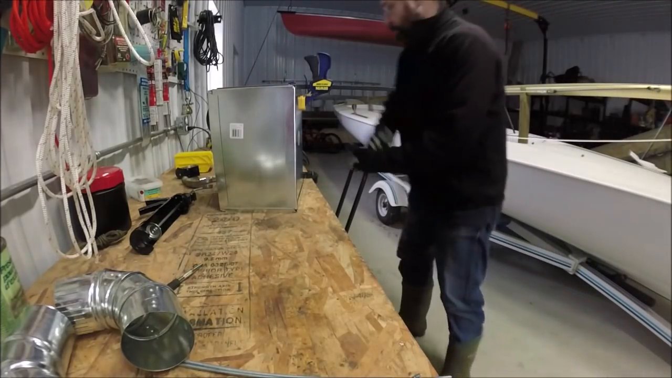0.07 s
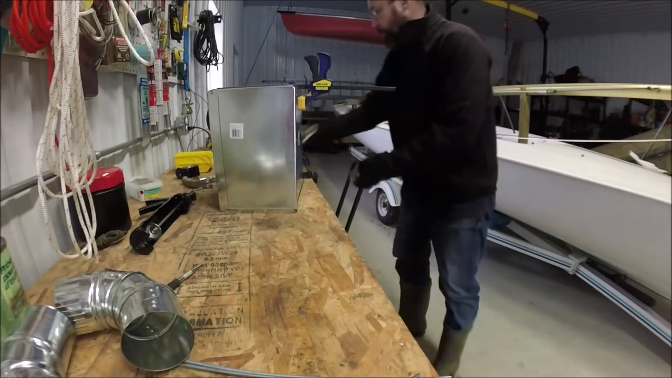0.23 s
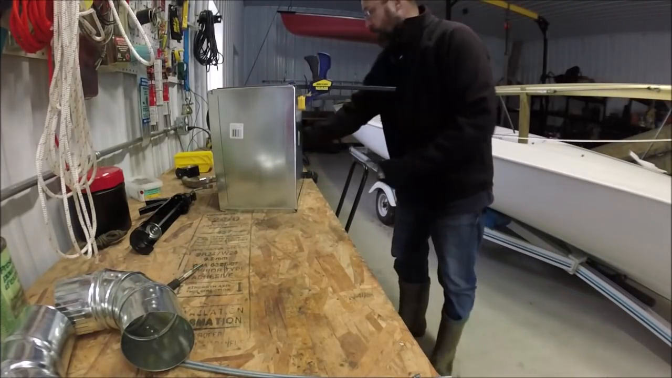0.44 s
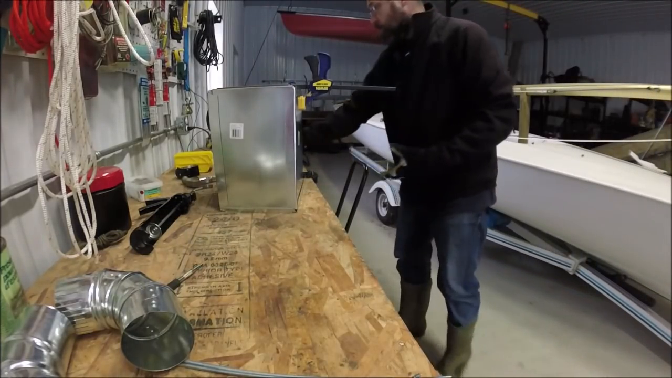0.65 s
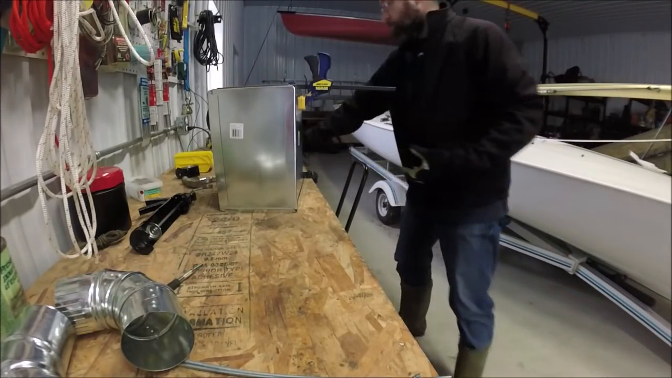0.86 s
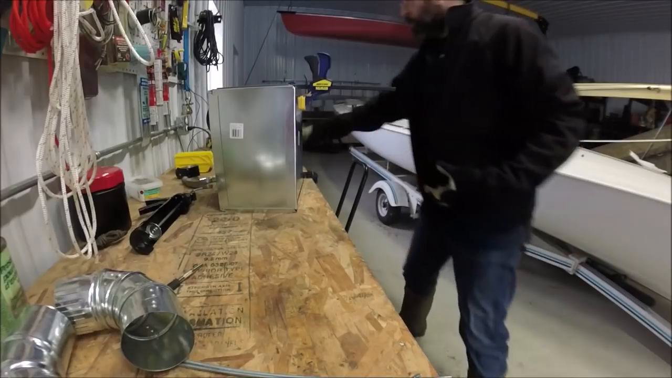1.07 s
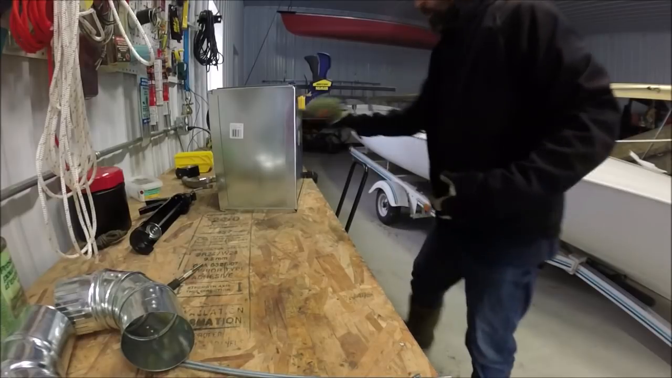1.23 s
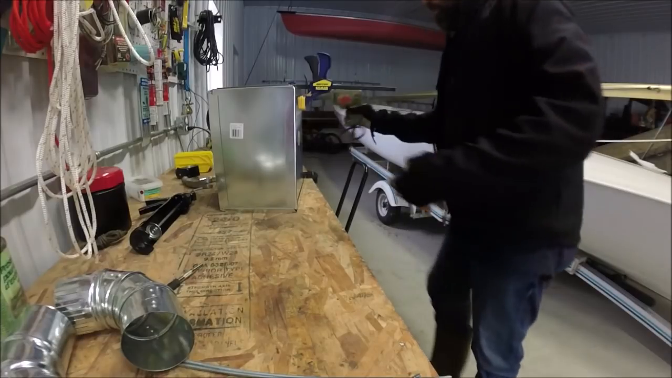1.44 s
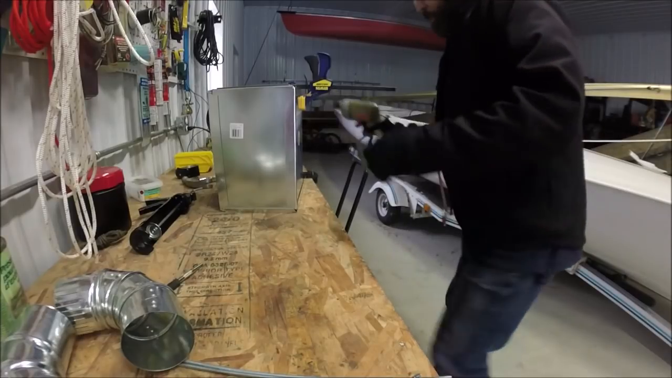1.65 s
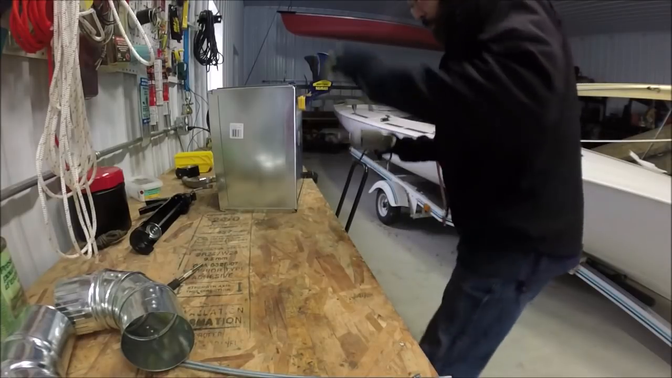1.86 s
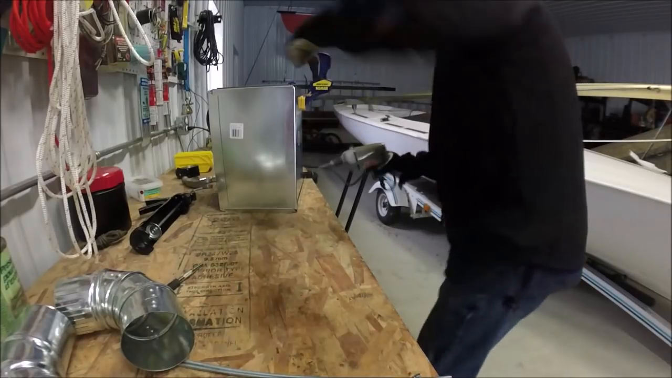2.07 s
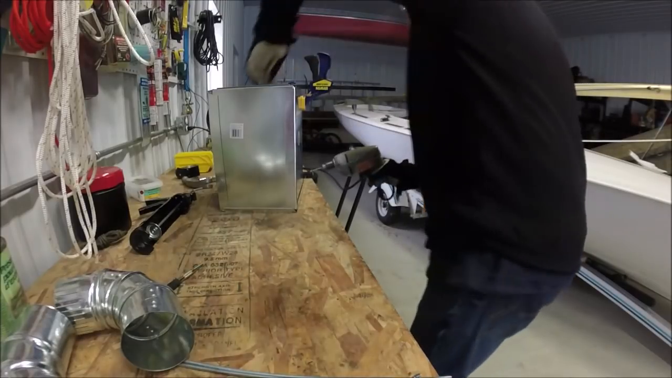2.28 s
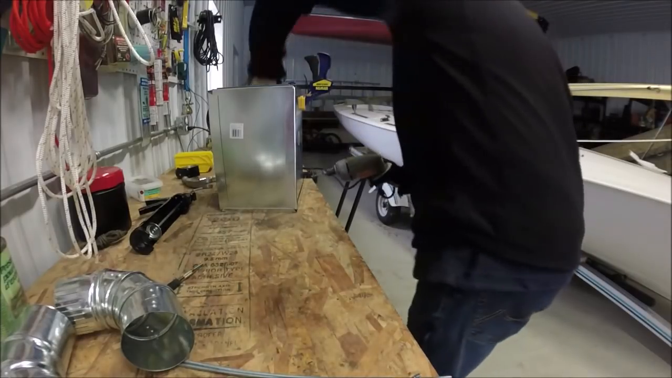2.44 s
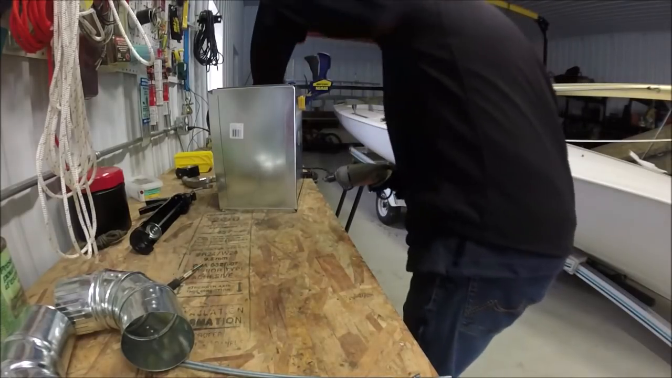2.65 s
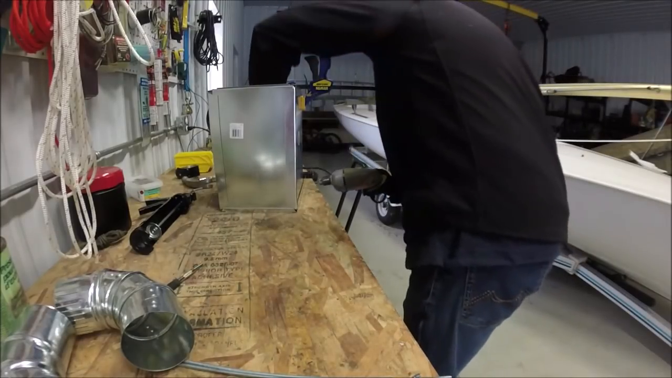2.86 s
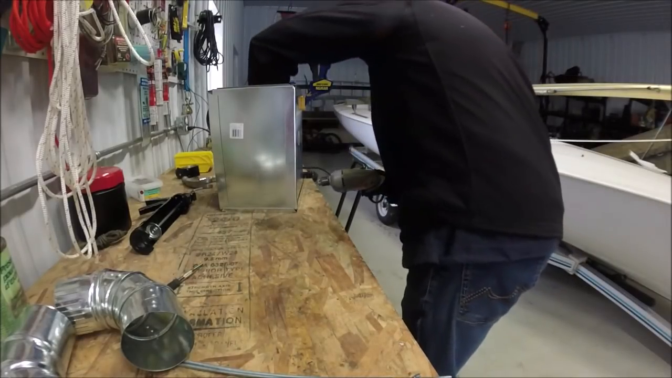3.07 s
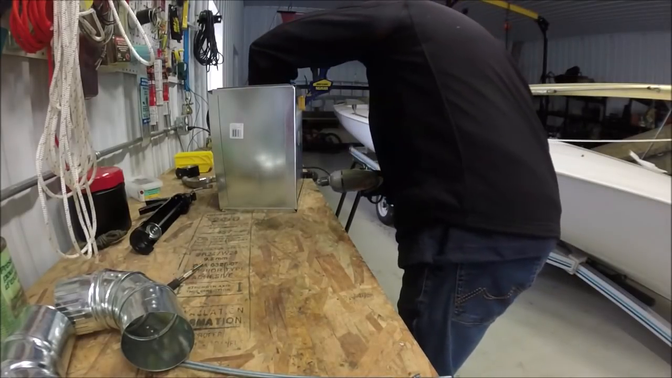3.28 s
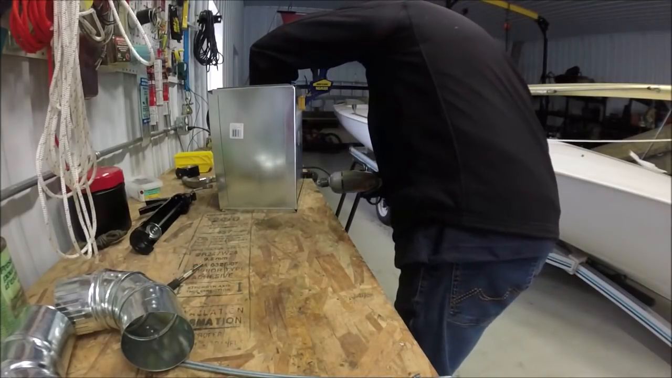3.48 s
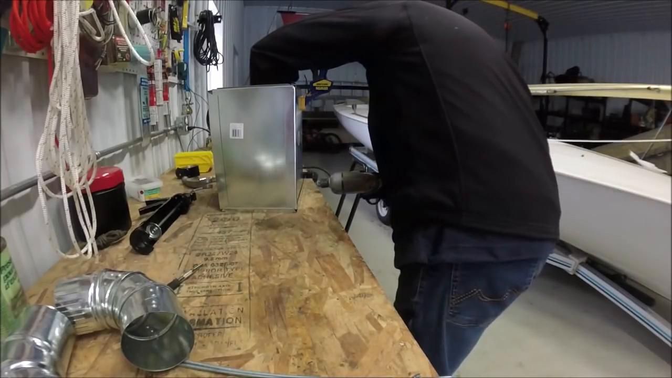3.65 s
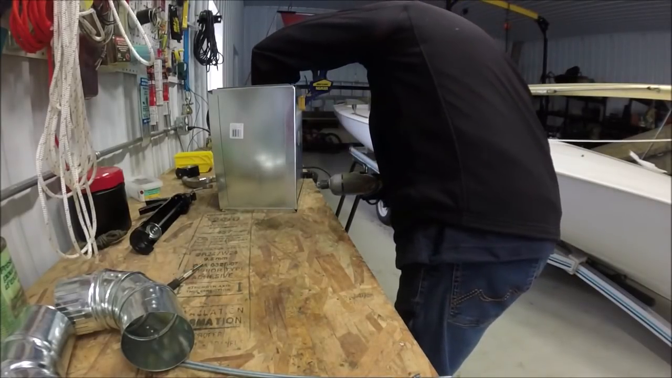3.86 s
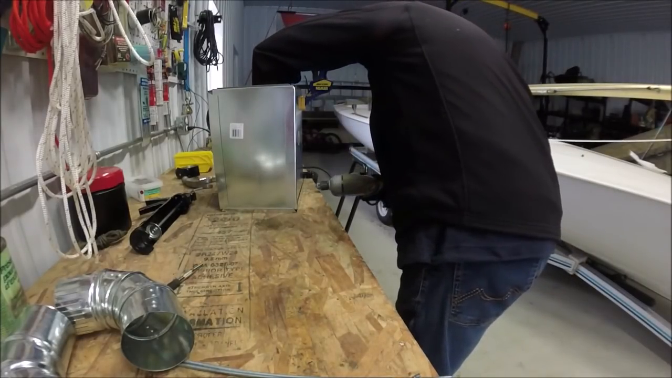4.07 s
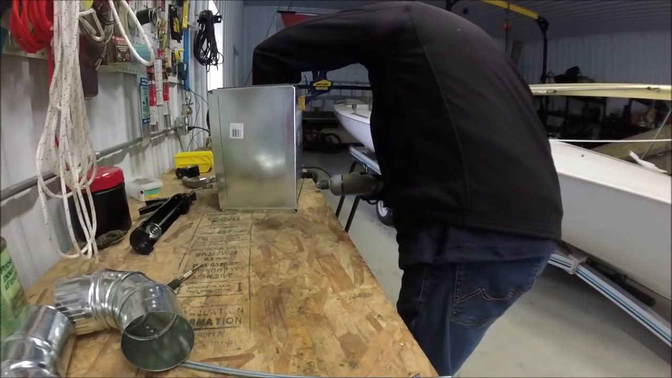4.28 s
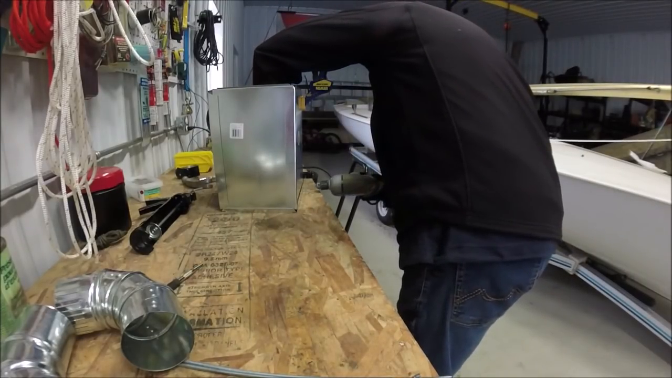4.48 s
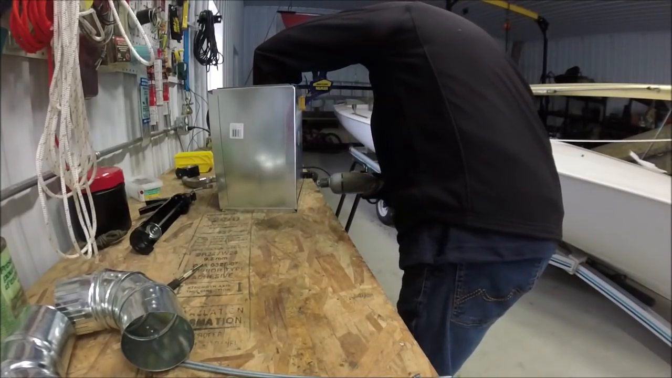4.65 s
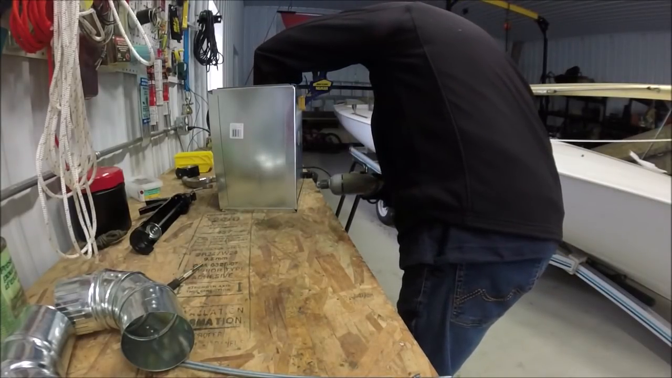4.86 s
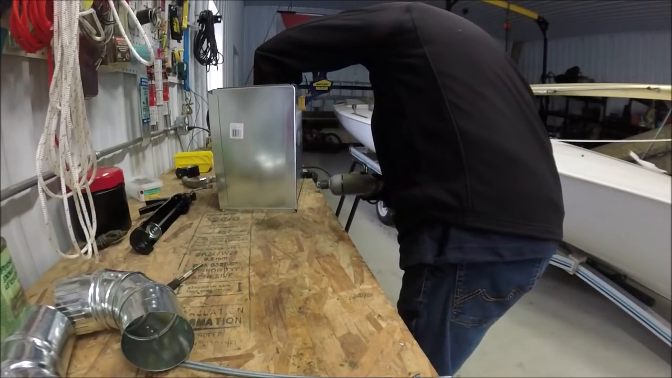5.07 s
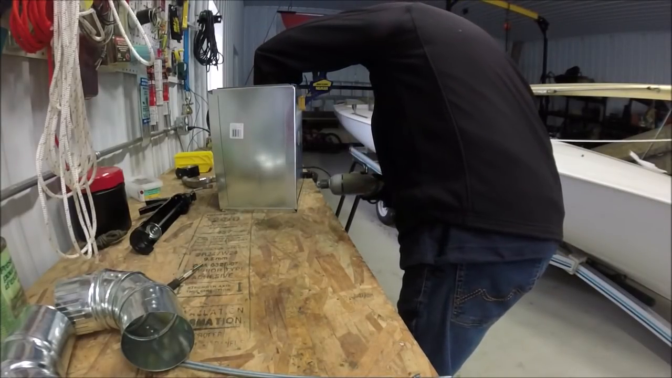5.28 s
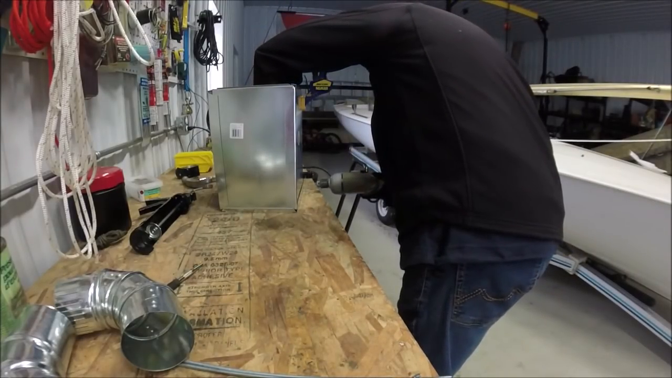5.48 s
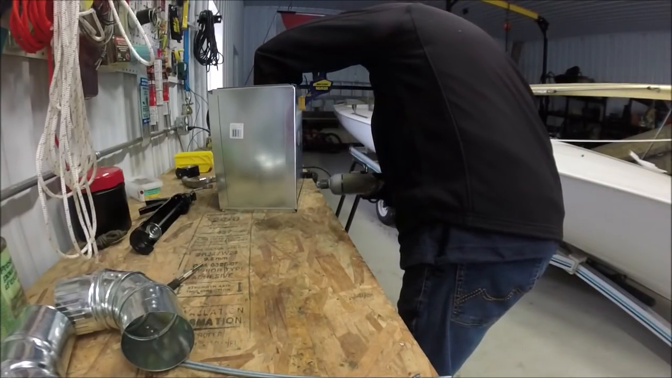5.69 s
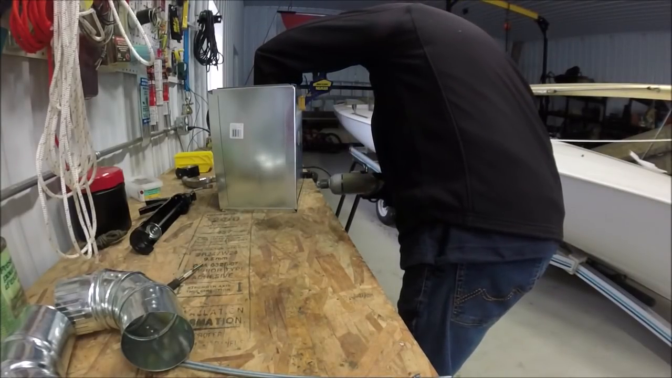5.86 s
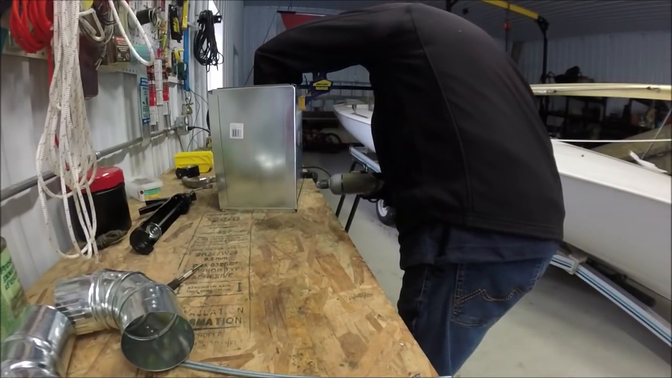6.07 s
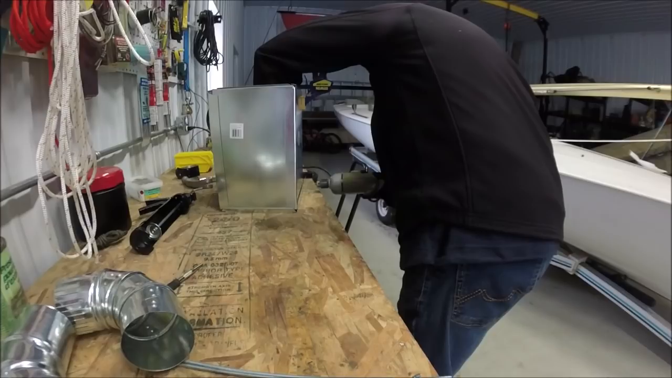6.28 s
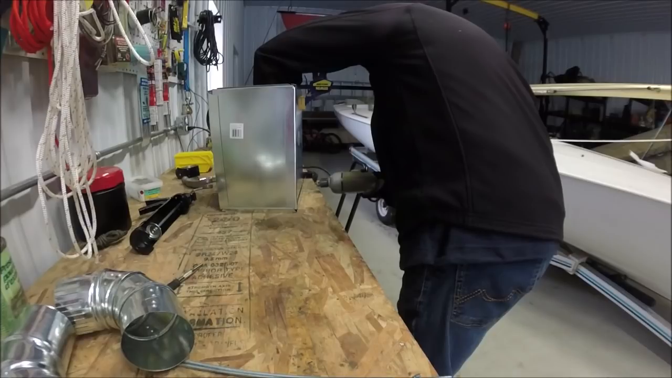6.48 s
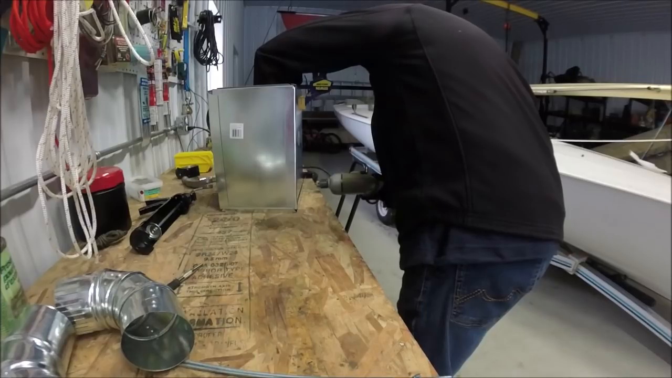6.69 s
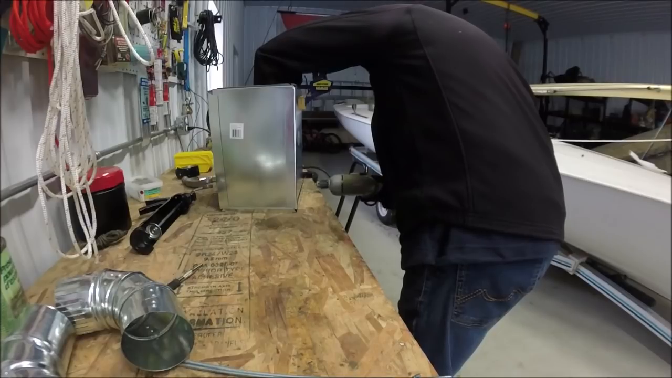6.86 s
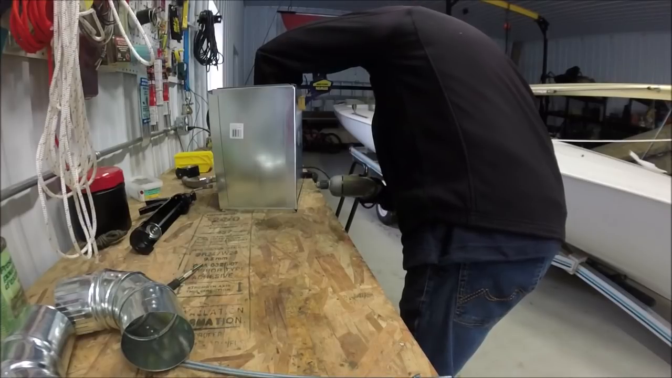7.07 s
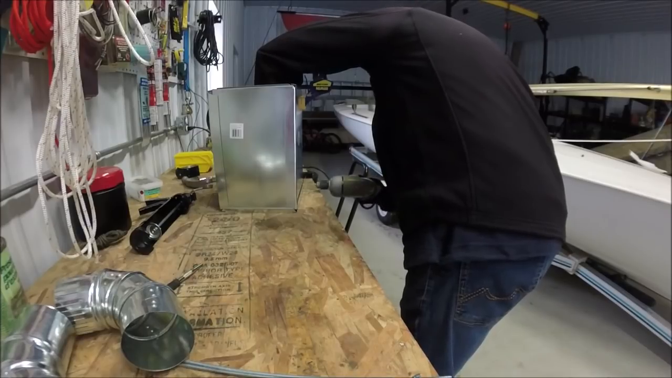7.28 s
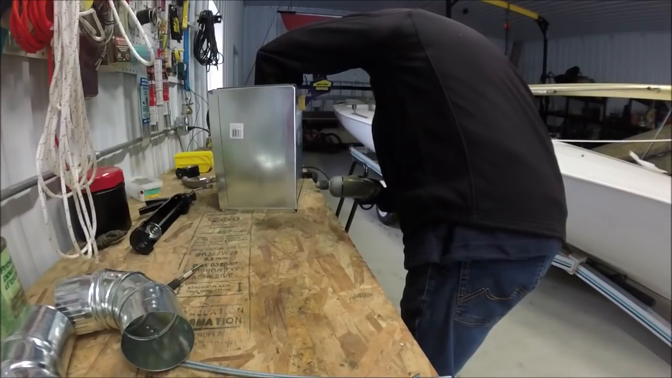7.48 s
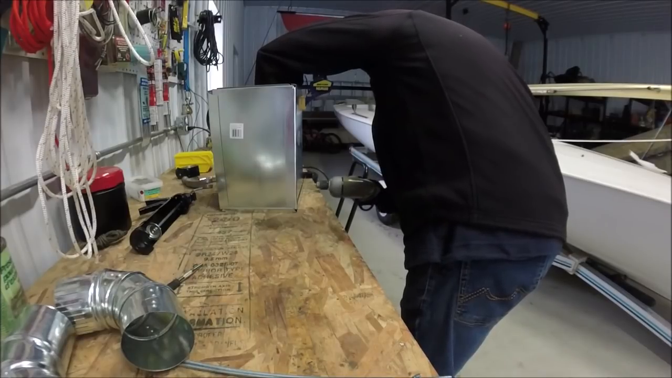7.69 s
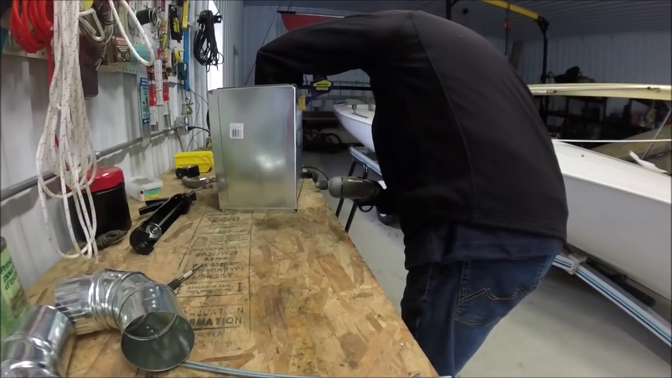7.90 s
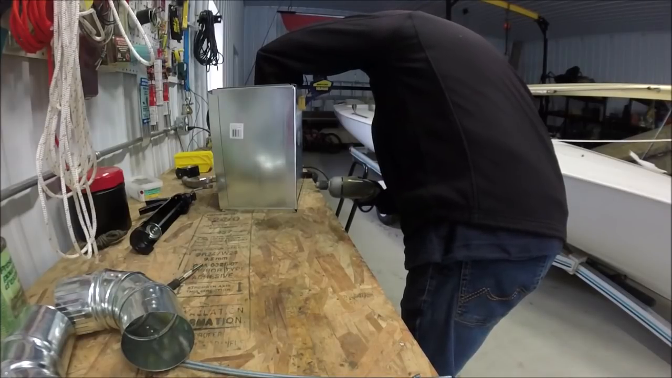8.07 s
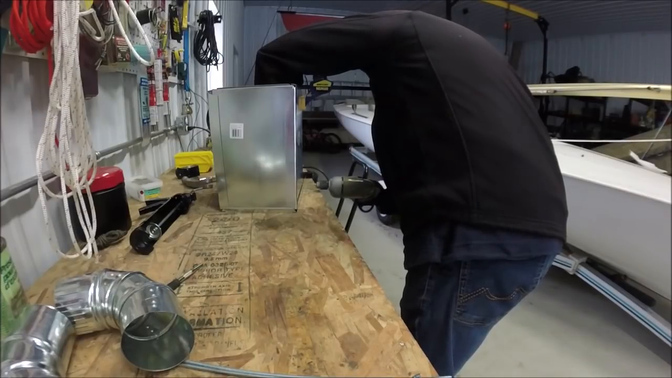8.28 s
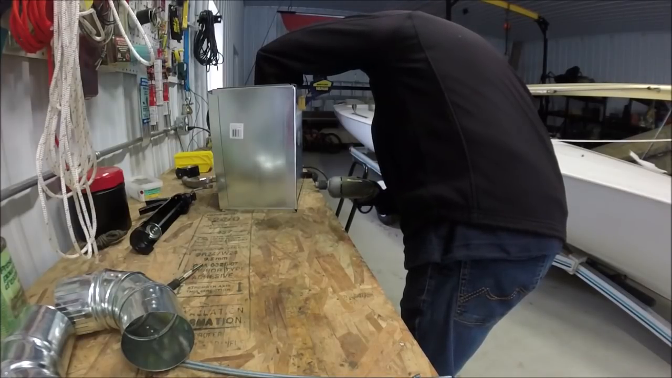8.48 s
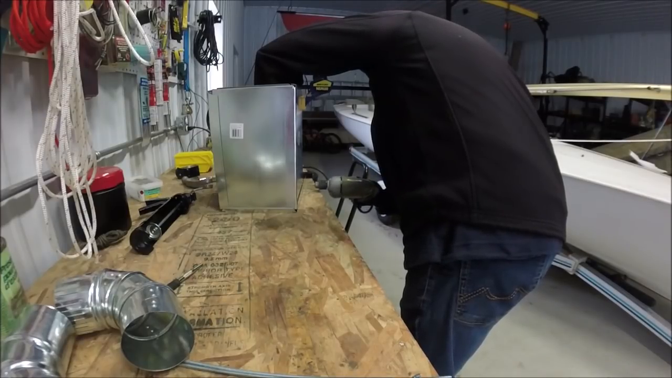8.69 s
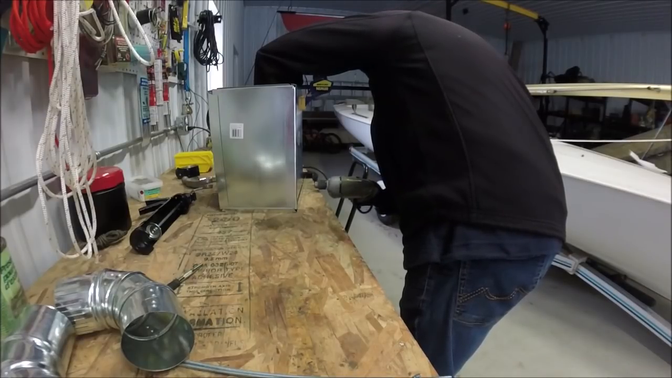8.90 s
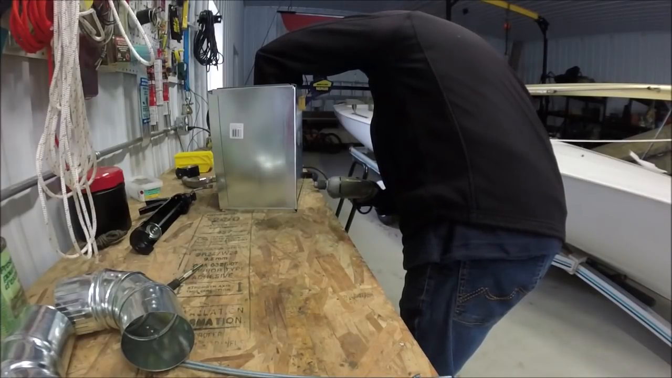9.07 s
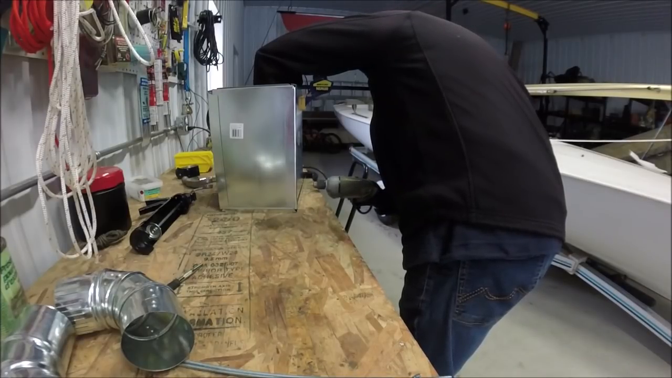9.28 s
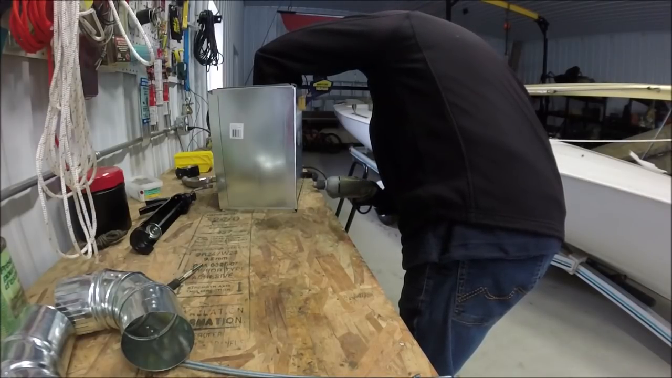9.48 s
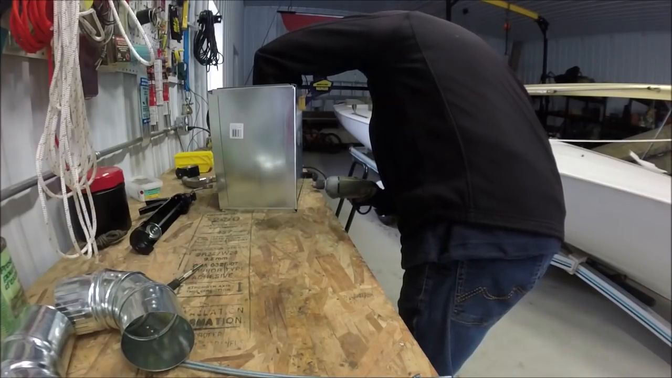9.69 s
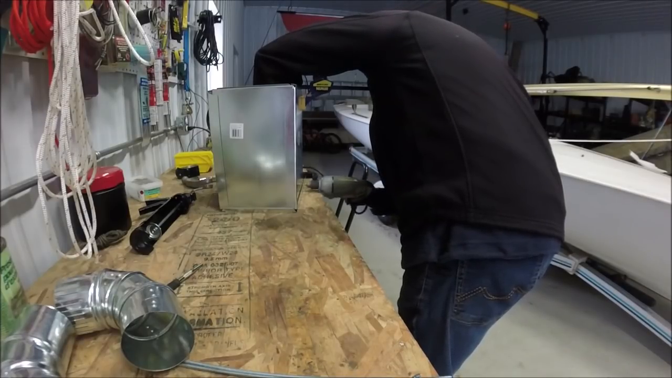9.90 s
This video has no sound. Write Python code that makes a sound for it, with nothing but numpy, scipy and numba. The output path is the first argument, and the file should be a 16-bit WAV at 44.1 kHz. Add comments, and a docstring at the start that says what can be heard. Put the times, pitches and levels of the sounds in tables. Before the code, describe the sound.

Sheet metal is knocked and set down with a clank, a bit squeaks against the wall, then a drill whirs and chatters loudly.

```python
"""A workshop with a sheet-metal box on a wooden bench. A tool is dragged off the bench, then the box is bumped
and scuffed while a screw bit is set on it; the drill starts, eases, and runs hard while its bit chatters.
Knocks, rubbing, skids and the drill push on damped modes of the box walls; singing, squeals and gear whine
are wavering tones. Boots and a tool set down ring modes of their own. A quiet hush and room echo surround it."""
import sys
import numpy as np
from scipy import signal
from scipy.fft import rfft, irfft, next_fast_len
from scipy.io import wavfile
from scipy.ndimage import uniform_filter1d
from numba import njit

SR = 44100
rng = np.random.default_rng(int(sys.argv[2]) if len(sys.argv) > 2 else 0)


def inscribe(sig):
    """Save sig as 16-bit PCM at rate SR to the path in sys.argv[1].

    A 1-D sig is mono; a 2-D sig holds one channel per row.
    Samples are clipped to [-1, 1] before scaling.
    """
    pcm = np.round(np.clip(np.atleast_2d(sig).T, -1, 1) * 32767)
    wavfile.write(sys.argv[1], SR, pcm.astype(np.int16))


N = 438354  # length in samples


def undb(db):
    """Turns decibels into an amplitude factor."""
    return 10 ** (np.asarray(db) / 20)


def unit(x):
    """Scales a signal to rms 1."""
    return x / np.sqrt(np.mean(x ** 2))


def curves(table, outside):
    """Table columns as signals, with a set level outside; a table that ends after 9.5 s holds its last value."""
    time, *columns = np.transpose(table)
    t = np.arange(N) / SR
    return [np.interp(t, time, c, outside, c[-1] if time[-1] > 9.5 else outside) for c in columns]


RING_LAG = SR // 300  # samples by which a family of modes builds up after its force


def ring(force, modes, band_hz):
    """Damped modes heard in one band, moved earlier by their build-up; white noise of rms 1 gives rms 1."""
    t = np.arange(SR // 2) / SR
    h = np.zeros(len(t))
    for hz, db, t60 in modes:
        h += undb(db) * np.sin(2 * np.pi * hz * t) * 1000 ** (-t / max(t60, .01))
    h = signal.sosfilt(signal.butter(4, band_hz, "band", fs=SR, output="sos"), h)
    h /= np.sqrt(np.sum(h ** 2))
    return signal.fftconvolve(force, h)[RING_LAG:RING_LAG + N]


def colour(x, points):
    """Shapes the spectrum of a signal by points of frequency and level."""
    size = next_fast_len(N)
    hz, db = np.transpose(points)
    bin_hz = np.arange(size // 2 + 1) * SR / size
    gain = undb(np.interp(np.log(bin_hz + 1), np.log(hz), db))
    return irfft(rfft(x, size) * gain, size)[:N]


def walk(rate, size=N):
    """Random levels held for 1 / rate seconds and smoothed twice; spread near 1."""
    k = int(SR / rate)
    steps = np.repeat(rng.standard_normal(size // k + 1), k)
    return 1.1 * uniform_filter1d(uniform_filter1d(steps, k), k)[:size]


def grit(rate, spread_db):
    """Sparse random slips of uneven size, about `rate` a second, scaled to rms 1."""
    happens = rng.random(N) < rate / SR
    return unit(happens * rng.standard_normal(N) * undb(spread_db * rng.exponential(size=N)))


def rough_tone(hz, width_hz, steady=0., size=N):
    """A tone smeared by quick random swings of size and sign around a steady part; rms near 1."""
    swing = (steady + walk(width_hz, size=size)) / np.hypot(steady, 1)
    return np.sqrt(2) * swing * np.sin(2 * np.pi * np.cumsum(hz * np.ones(size)) / SR)


# background spectrum: (frequency [Hz], relative level [dB per Hz])
SHOP_SPECTRUM = [(12, -38), (20, 1.5), (59, 0.5), (367, -8.5), (497, -6.5), (915, -4.5), (1210, -16),
                 (1350, -10.5), (1830, -14.5), (2350, -17.5), (9910, -32), (13800, -38.5), (15000, -41)]
SHOP_DB = -58


def shop():
    """Steady workshop hush: noise shaped by a fixed spectrum."""
    return unit(colour(rng.standard_normal(N), SHOP_SPECTRUM)) * undb(SHOP_DB)


CLANK_SHARE = 0.46  # the clank lies this far from the high ring towards the tick, in dB
# sharp knocks: (time [s], high ring level [dB], boom level [dB], low ring level [dB], tick level [dB],
# contact time constant [s])
KNOCK_EVENTS = [(0.174, -41, -53, -45, -69, 0.0027), (0.33, -53, -62, -60, -80, 0.018),
                (0.462, -42, -42, -37, -63, 0.0052), (0.628, -46, -42, -58, -70, 0.0047),
                (0.798, -26.5, -41, -28, -63, 0.0029), (1.039, -34, -45, -35, -59.5, 0.0072),
                (1.08, -48, -39, -31, -84, 0.012), (1.214, -35.5, -43, -39.5, -70, 0.029),
                (1.252, -34.5, -52, -47, -68, 0.011), (1.33, -48, -45, -45, -72, 0.01),
                (1.384, -38, -38, -45.5, -72, 0.0044), (1.477, -43.5, -70, -59, -69, 0.0058),
                (1.577, -54, -42, -68, -82, 0.018), (2.077, -9, -46, -33, -56, 0.0041),
                (2.227, -42, -39.5, -36, -74, 0.027), (2.276, -37, -58, -37, -71, 0.024),
                (2.374, -34.5, -56, -54, -69, 0.006), (2.458, -44.5, -55, -50, -77, 0.014),
                (2.743, -49, -75, -60, -90, 0.027), (3.076, -36.5, -40.5, -40.5, -90, 0.032),
                (3.245, -32, -37.5, -38, -56.5, 0.028), (6.576, -23.5, -31.5, -26, -54, 0.027),
                (6.719, -14, -24, -20, -47.5, 0.017)]


def knocks():
    """Forces on the four mode families and a bare tick: each contact is a rough burst that dies away."""
    force, t = np.zeros((5, N + 8192)), np.arange(8192) / SR
    for time, high_db, boom_db, low_db, tick_db, contact in KNOCK_EVENTS:
        rise = np.minimum(t / 0.0028, 1)
        burst = rng.standard_normal(8192) * np.exp(-t / max(contact, .001)) * rise
        burst *= np.sqrt(contact * SR / 2 / np.sum(burst ** 2))  # energy grows with contact time
        clank_db = high_db + CLANK_SHARE * (tick_db - high_db)
        levels = undb([boom_db, low_db, high_db, clank_db, tick_db])
        i = int(time * SR)
        force[:, i:i + 8192] += levels[:, None] * burst
    return force[:, :N]


PRESSED = 0.49  # share of the ring time left to the clank while the drill presses on the wall
# four families of box wall modes: (frequency [Hz], relative level [dB], 60 dB decay time [s])
BOOM_MODES = [(109.5, -11, 0.15), (164, -15.5, 0.61), (226.2, -2.5, 0.25), (266.2, 5, 0.083),
              (322, 8, 0.05), (397.9, 5.5, 0.1), (459.4, 12.5, 0.056)]
LOW_MODES = [(555, -8, 0.11), (594, 1, 0.085), (614.5, -3, 0.099), (666.6, 3.5, 0.081), (696.7, 1.5, 0.14)]
HIGH_MODES = [(798, -8, 0.099), (892, 3.5, 0.044), (951, -4.5, 0.061), (1006, 0.5, 0.046), (1108, 4, 0.039),
              (1190, -3.5, 0.073), (1355, -13, 0.054)]
CLANK_MODES = [(1472, 4.5, 0.072), (1657, 3, 0.07), (1847, 6.5, 0.043), (1942, 3, 0.067),
               (2124, 6.5, 0.036), (2585, -4.5, 0.041), (2770, -14, 0.099), (3107, -7, 0.073)]
# band in which each family is heard: (lowest frequency [Hz], highest frequency [Hz])
FAMILY_BANDS = [(110, 420), (500, 768), (740, 1353), (1300, 3130)]


def box_walls(free, pressed):
    """Forces ring the sheet metal in four families of modes; under the drill the clank dies sooner."""
    force = free.copy()
    force[:3] += pressed[:3]
    families = (BOOM_MODES, LOW_MODES, HIGH_MODES, CLANK_MODES)
    box = sum(ring(f, modes, band) for f, modes, band in zip(force, families, FAMILY_BANDS))
    return box + ring(pressed[3], np.array(CLANK_MODES) * [1, 1, PRESSED], FAMILY_BANDS[3])


# modes of the steel bit: (frequency [Hz], relative level [dB], 60 dB decay time [s])
BIT_MODES = [(2660, -6, .03), (3825, 2.5, 0.048), (5290, 7, 0.028), (5700, 1, 0.031), (6450, -12, .02),
             (9620, 2.5, 0.014)]


def ticks(force):
    """The steel bit rings at each touch, over the bright noise of the bare contact."""
    crack = colour(force, [(1800, -27), (3000, 5.0), (7000, -10.0), (14000, -26)])
    return ring(force, BIT_MODES, (2200, 13000)) + undb(12.5) * crack


RUB_HIGH_DB, RUB_CLANK_DB = 4, -12  # against the low ring
# rubbing of tool and gloves on bench and box: (time [s], low ring level [dB], boom level [dB])
RUB_CURVE = [(0, -99, -92), (.4, -68, -64), (.5, -64, -49), (.72, -70, -70), (.84, -54.5, -47.5),
             (.95, -46, -39.5), (1.08, -52.5, -40.5), (1.17, -56.5, -50), (1.27, -66, -51),
             (1.36, -56, -50.5), (1.5, -81, -83), (2.07, -76, -75), (2.14, -52, -48.5), (2.28, -56, -47),
             (2.8, -74.5, -68), (3.91, -62, -60.5), (4.95, -60, -62), (5.4, -67, -64), (6.55, -68, -65),
             (6.75, -57, -41.5), (7.2, -64.5, -67.5)]


def rubbing():
    """Many tiny stick-and-slip grains push on the box modes."""
    ring_db, boom_db = curves(RUB_CURVE, -120)
    slips = grit(4000, 2.2) * undb(1.6 * walk(40))
    return undb([boom_db, ring_db, ring_db + RUB_HIGH_DB, ring_db + RUB_CLANK_DB]) * slips


def thuds(events, modes, band_hz):
    """Single-sample jolts ring the modes of one object."""
    force = np.zeros(N)
    for time, db in events:
        force[int(time * SR)] = undb(db)
    return ring(force, modes, band_hz)


# boots on the floor: (time [s], force level [dB])
STEP_EVENTS = [(0.469, -18), (1.049, -10.5), (1.588, -23), (2.569, -23)]
# floor modes: (frequency [Hz], relative level [dB], 60 dB decay time [s])
FLOOR_MODES = [(48.2, -12, 0.19), (71.4, 10, 0.15)]


def footsteps():
    """Each boot jolts low, quickly damped modes of the floor."""
    return thuds(STEP_EVENTS, FLOOR_MODES, (30, 130))


# squeals of the tool or the bit: (start time [s], frequency [Hz], nominal width [Hz], nominal level [dB],
# length [s])
SQUEAL_PATCHES = [(1.255, 4900, 1800, -60, .045), (7.921, 12860, 1802, -42, 0.27),
                  (8.374, 12100, 799, -48, 0.073), (8.472, 13070, 600, -34, 0.06),
                  (8.567, 13720, 601, -42, 0.17), (8.792, 13570, 447, -38, 0.15),
                  (8.925, 13560, 400, -34, 0.039), (9.005, 11500, 1504, -41, 0.035),
                  (9.065, 11000, 1200, -41, 0.024), (9.12, 13780, 449.3, -46, 0.25),
                  (9.135, 9700, 890, -32.5, 0.023), (9.165, 11000, 1400, -26, 0.024),
                  (9.19, 10180, 1012, -32, 0.022), (9.21, 13100, 602, -46, .09),
                  (9.235, 9700, 810, -32, .025), (9.282, 9650, 894, -27.5, 0.048),
                  (9.335, 10600, 1614, -31, 0.03), (9.89, 10230, 1220, -33, 0.05),
                  (9.89, 13000, 896, -47, 0.042)]


def squeals():
    """Each patch swells and fades in quick flickers, a tone with a wide skirt."""
    out = np.zeros(N + SR)
    for time, hz, width_hz, db, length in SQUEAL_PATCHES:
        n = int(2 * length * SR)  # leaves space for the soft edges
        i = int((time - length / 2) * SR)
        tone = rough_tone(hz, width_hz * 0.86, size=n)
        tone += 0.66 * rough_tone(hz, width_hz * 2.2, size=n)
        flicker = undb(db - 3 + 5.7 * walk(74, size=n))
        out[i:i + n] += flicker * np.exp(-np.linspace(-2, 2, n) ** 2) * tone
    return out[:N]


# a tool is set down and bounces once: (time [s], force level [dB])
SET_DOWN_EVENTS = [(2.0808, 4.5), (2.0853, 8.5)]
# modes of tool and bench: (frequency [Hz], relative level [dB], 60 dB decay time [s])
TOOL_MODES = [(168.4, -12, 0.33), (297, -13, 0.16), (320, -20, 0.13), (388, -12, 0.18), (520, -8.5, 0.13),
              (608, -8, 0.2), (703, -2, 0.12), (852, 1, 0.054), (910, -12, 0.08), (1140, -1.5, 0.041),
              (1190, -2, 0.063), (1334, -11, 0.063), (1440, -1.5, 0.067)]


def set_down():
    """Two close jolts ring the tool and the bench."""
    return thuds(SET_DOWN_EVENTS, TOOL_MODES, (155, 1700))


SWELL_S, SWELL_AT_DB, SWELL_DOUBLES_DB = 0.016, -24, 15  # swell time at a level; doubles per 15 dB louder
SKID_ROUGH_DB = -15  # rough part on the high ring against the skid, at SWELL_AT_DB
LOCK_ON = .55  # dB by which the rough wall force falls behind for each dB that the high ring is louder
WALL_TONE_HZ = 689.3  # the low mode under the bit
OVERTONE_DB = -39  # octave of the singing mode, against the skid's high ring level
SING_SHARPNESS = 2.5  # the singing swells later and stops sooner than the rough part
SING_TAIL, SING_TAIL_S = .15, 0.077  # the singing mode rings on after the skid: share, time constant
# the bit skids on the wall and one mode sings: (time [s], nominal high ring level [dB],
# nominal low ring level [dB], nominal tick level [dB], singing frequency [Hz])
SKID_EVENTS = [(3.573, -35.5, -41.5, -55, 800), (3.713, -37.5, -40, -52.5, 1186),
               (3.78, -17.5, -34, -50, 997), (3.828, -24.5, -57, -73, 995),
               (3.872, -22.5, -23, -46.5, 1184), (4.011, -26.5, -30.5, -56.5, 1088),
               (4.331, -34.5, -47, -64, 1053), (4.43, -22, -31.5, -54, 985), (4.548, -47, -65, -64, 990),
               (4.645, -42.5, -48, -69, 990), (4.757, -45, -45.5, -53.5, 1190),
               (4.834, -23.5, -40.5, -50.5, 1007), (5.004, -37, -47, -61, 924), (5.098, -48, -71, -71, 807),
               (5.215, -46, -44, -60, 1020), (5.245, -41, -37.5, -59, 1194), (5.285, -43, -41.5, -61, 925),
               (5.425, -43, -45, -59, 1220), (5.58, -52, -45.5, -62, 880), (5.657, -24, -33.5, -48, 1181),
               (5.798, -30.5, -38.5, -47.5, 993), (6.057, -49, -49.5, -55.5, 1190),
               (6.175, -39.5, -56, -68, 996), (6.204, -32, -45, -60, 1153),
               (6.261, -33, -33.5, -56.5, 1193), (6.678, -23, -22.5, -42.5, 1133)]


def skids():
    """Returns forces and squeaks: friction swells, fades, and locks on to a wall mode."""
    force, squeak, t = np.zeros((5, N)), np.zeros(N), np.arange(8192) / SR
    for time, high_db, low_db, tick_db, hz in SKID_EVENTS:
        rough, *waver = rng.standard_normal((3, 8192))
        swell = SWELL_S * 2 ** ((max(high_db, low_db) - SWELL_AT_DB) / SWELL_DOUBLES_DB)
        shape = (t / swell * np.exp(1 - t / swell)) ** 0.72
        tail = SING_TAIL * np.minimum(t / swell, 1) * np.exp(-t / SING_TAIL_S)
        quick = np.exp(-t / (1.23 * swell)) * np.minimum(t / 0.0015, 1)  # treble starts at first touch
        wall_db = np.array([low_db - 20, low_db - 16.0, high_db + SKID_ROUGH_DB])
        wall_db -= LOCK_ON * (high_db - SWELL_AT_DB)
        touch = undb([tick_db - 3.5, tick_db - 10.5])[:, None] * [shape + quick, quick]
        i = int(time * SR)
        force[:3, i:i + 8192] += undb(wall_db)[:, None] * shape * rough
        force[3:, i:i + 8192] += touch * rough
        for db, tone_hz, w in zip((low_db - 1.5, high_db - 9.0), (WALL_TONE_HZ, hz), waver):
            swing = (shape ** SING_SHARPNESS + tail) * (1 + 4 * uniform_filter1d(w, 400))
            squeak[i:i + 8192] += undb(db + 2) * swing * np.sin(2 * np.pi * tone_hz * t)
        octave = np.sin(2 * np.pi * 2 * hz * t)
        squeak[i:i + 8192] += undb(high_db + OVERTONE_DB) * (shape + 2 * tail) * octave
    return force, squeak


# trigger or load changes: (time [s], gear mesh frequency that the motor heads for [Hz], time constant [s])
SPEED_CHANGES = [(7.19, 3786, 0.11), (7.309, 1280, 0.19), (7.74, 3600, .09), (7.9, 3398, 0.058),
                 (8.4, 2604, 0.18), (8.63, 3390, 0.2)]


def spindle():
    """Gear mesh in Hz: after each change the gap to the new speed closes exponentially."""
    t, hz = np.arange(N) / SR, np.zeros(N)
    for time, aim_hz, lag in SPEED_CHANGES:
        i = int(time * SR)
        hz[i:] = aim_hz + (hz[i] - aim_hz) * np.exp(-(t[i:] - time) / lag)
    return hz


TEETH_PER_BLOW = 88  # gear teeth that mesh between two blows of the bit
HISS_DB, TOP_HISS_DB, GEAR_CLANK_DB = -30, -52.5, -38  # at full speed and the final grind level
DB_PER_OCTAVE = 8.5  # how these fall as the speed drops
GRIND_LOW_DB, GRIND_DRIVES_HISS = -0.5, 0.46  # low ring against high ring; dB of hiss per dB of grind
WHINE_DB, IDLE_WHINE_DB = -35.5, -53  # peak while pulling up to speed; part that follows speed alone
HOUSING_DRIFT, HOUSING_WAVER_DB = .004, 1.3  # grip and load shift each resonance: share of pitch, dB
# grind of the bit on the wall: (time [s], high ring level [dB], boom level [dB])
GRIND_CURVE = [(7.19, -50, -60), (7.23, -34.5, -36.5), (7.275, -32.5, -25), (7.32, -33.5, -35.5),
               (7.74, -34.5, -35.5), (7.8, -28.5, -29), (7.89, -29, -18), (7.99, -28.5, -27.5),
               (8.1, -25.5, -25.5), (8.3, -31.5, -33.5), (8.58, -29.5, -28.5), (8.82, -24, -22.5),
               (8.91, -29.5, -37), (8.96, -26, -24), (9.1, -27.5, -33), (9.3, -29.5, -29.5),
               (9.5, -27.5, -34), (9.9, -28.5, -27.5)]
# drill housing resonances: (frequency [Hz], width [Hz], relative level [dB])
HOUSING_MODES = [(3790, 300, -4), (4330, 140, -4), (5390, 400, -3), (5790, 220, -2.5), (7180, 200, -6),
                 (8290, 70, 2.5), (8860, 160, -5)]
# motor noise spectrum: (frequency [Hz], relative level [dB per Hz])
MOTOR_SPECTRUM = [(1350, -3), (2300, -5), (3170, -10), (4280, -5.5), (4740, -8), (5720, -6.5), (7710, -9),
                  (8400, -5), (13100, -21.5), (15000, -27)]


def drill():
    """Returns the bit's forces on the wall, one blow a turn, and the drill's own hiss and gear whine."""
    high_db, boom_db = curves(GRIND_CURVE, -120)
    mesh_hz = spindle()
    running, speed = mesh_hz > 0, mesh_hz / mesh_hz.max()
    spin_db = DB_PER_OCTAVE * np.log2(speed + 1e-4) + GRIND_DRIVES_HISS * (high_db - high_db[-1])

    # the bit catches once a turn: a short hump of slips over a steady grind
    turns = np.cumsum(mesh_hz / TEETH_PER_BLOW * (1 + 0.03 * walk(20))) / SR
    size = undb(3.4 * rng.standard_normal(200))[turns.astype(int)]
    blows = size * np.exp(-((turns % 1 - .3) / 0.1) ** 2)
    bite = np.array([0.51, 1.4, 4.4, 1.1])[:, None] + blows
    bite /= np.sqrt(np.mean(bite[:, running] ** 2, axis=1, keepdims=True))
    levels = undb([boom_db, high_db + GRIND_LOW_DB, high_db, spin_db + GEAR_CLANK_DB])
    force = rng.standard_normal((4, N)) * bite * levels

    housing = np.zeros(N)
    for hz, width_hz, db in HOUSING_MODES:
        tone = rough_tone(hz * (1 + HOUSING_DRIFT * walk(1.7)), width_hz)
        housing += undb(db + HOUSING_WAVER_DB * walk(2.49)) * tone
    air = unit(colour(grit(20000, 0.48), MOTOR_SPECTRUM)) + undb(-7.5) * speed * unit(housing)
    air *= (1 + 0.31 * blows) * undb(0.49 * walk(17))
    top = signal.sosfilt(signal.butter(4, 11000, "high", fs=SR, output="sos"), air)
    hiss = (unit(air - top) * undb(HISS_DB) + unit(top) * undb(TOP_HISS_DB)) * undb(spin_db)

    # teeth sing under torque, more so when fast
    pull = speed ** 2 * np.maximum(np.gradient(mesh_hz), 0)
    whine_level = undb(WHINE_DB) * pull / pull.max() + undb(IDLE_WHINE_DB) * speed
    return force, hiss + whine_level * rough_tone(mesh_hz, 800, steady=0.63)


CLANK_S = 0.0057  # the clank is a rattle that peaks after this time and then dies
CATCH_HZ, CATCH_SPREAD_HZ, CATCH_S = 621, 26, .0045  # wall flexing: pitch, its spread, half-width of swell
CATCH_GLIDE_HZ_S = 12000  # the wall stiffens as it is pushed in, so the pitch climbs
# how a catch drives boom and high ring, against its peak: (boom level [dB], high ring level [dB])
CATCH_DRIVE = [2.5, 8]
# hard catches of the bit in the wall: (time of the peak [s], peak level [dB], clank level [dB])
CATCH_EVENTS = [(7.8644, -4, -38), (7.8852, -3, -31.3), (7.907, -10, -33.6), (7.9314, -7.5, -26),
                (7.9626, -12.5, -41), (7.9743, -15, -40), (8.0019, -14.5, -29.5), (8.0515, -15.2, -35),
                (8.086, -6, -35), (8.1057, -7.5, -31), (8.1378, -12.5, -39), (8.1609, -12, -33),
                (8.1862, -12, -33), (8.2193, -11, -35), (8.3095, -14.5, -28.5), (8.418, -13.5, -25),
                (8.5801, -12.5, -38), (8.6155, -14.5, -44), (8.6739, -12.5, -34), (8.7081, -8.5, -32.3),
                (8.7232, -10, -33.3), (8.7389, -10.2, -37), (8.767, -9.5, -33.9), (8.7953, -5, -25),
                (8.8221, -14, -43), (8.836, -15, -37), (8.8488, -9.5, -34), (8.8615, -11.5, -26.5),
                (8.9263, -12, -37), (8.9429, -12, -34), (8.9689, -14.5, -35), (8.982, -10, -38),
                (9.008, -11, -32), (9.0345, -11, -32.9), (9.0597, -15, -35), (9.0856, -10.5, -27),
                (9.1111, -9, -30.8), (9.1384, -9.5, -38), (9.1616, -10.5, -29.5), (9.2129, -8, -30),
                (9.2331, -9.5, -28.5), (9.2572, -12, -33), (9.288, -16, -36), (9.384, -14.5, -44),
                (9.5624, -14.5, -35), (9.6094, -11.5, -35), (9.6232, -9, -36), (9.6828, -9.9, -37),
                (9.755, -12, -44), (9.7671, -14, -38), (9.8267, -9.5, -41), (9.839, -13.5, -38),
                (9.8649, -13, -30.5), (9.8912, -10.4, -24)]


def catches():
    """Returns forces and flexing: a jolt and a rattle into the modes, and a short swell of the wall."""
    force, flex, t = np.zeros((4, N + 2048)), np.zeros(N + 2048), np.arange(2048) / SR
    for time, db, clank_db in CATCH_EVENTS:
        rough = rng.standard_normal(2048)
        jolt = 0.081 * rough * np.exp(-np.abs(t - .006) / 0.0041)
        jolt[SR // 160] = 1
        i = int(time * SR) - SR // 100  # begins 10 ms before the peak
        force[[0, 2], i:i + 2048] += undb(db + np.array(CATCH_DRIVE))[:, None] * jolt
        rattle = rough * t / CLANK_S * np.exp(1 - t / CLANK_S)
        force[3, i:i + 2048] += undb(clank_db) * rattle
        held = t - 1 / 100  # seconds from the peak
        hz = CATCH_HZ + CATCH_SPREAD_HZ * rough[0] + CATCH_GLIDE_HZ_S * held / 2
        bend = np.sin(2 * np.pi * hz * held + 2 * rough[1])
        flex[i:i + 2048] += undb(db) * np.exp(-(held / CATCH_S) ** 2) * bend
    return force[:, :N], flex[:N]


@njit
def echoes(x, lags, gain, damp):
    """Eight delay lines that feed each other, duller on every round."""
    line, soft, out = np.zeros((8, 4096)), np.zeros(8), np.zeros(len(x))
    for i in range(len(x)):
        total = 0.
        for k in range(8):
            soft[k] += (1 - damp) * (gain[k] * line[k, (i - lags[k]) & 4095] - soft[k])
            total += soft[k]
            out[i] += soft[k] * (1 - 2 * (k % 2))
        for k in range(8):
            line[k, i & 4095] = x[i] + soft[k] - total / 4
    return out


ROOM_T60_S, ROOM_DAMP, ROOM_DB = 0.77, 0.28, -19.5  # decay time before damping, dulling per round, level
SQUEAK_ROOM_DB = -8  # the squeak beams off the wall and feeds the room less


def room(near, squeak):
    """Sound bounces around the workshop and fades, its treble first."""
    lags = rng.integers(700, 2800, 8)
    gain = undb(-60 * lags / SR / ROOM_T60_S)
    source = near + undb(SQUEAK_ROOM_DB) * squeak + 1e-18  # the tiny offset keeps the maths fast
    return undb(ROOM_DB) * echoes(source, lags, gain, ROOM_DAMP)


def scene():
    """Pushes on the box, adds the other sources, then the room and the hush."""
    scrape, squeak = skids()
    bit, motor = drill()
    jolts, flex = catches()
    hits = knocks() + scrape
    box = box_walls(hits[:4] + rubbing(), bit + jolts) + flex
    near = box + ticks(hits[4]) + motor + squeals() + footsteps() + set_down()
    return (near + squeak + room(near, squeak) + shop())[None]


TOP_HZ = 15120


def record(dry):
    """Rounds the loudest peaks and cuts the treble steeply above TOP_HZ."""
    soft = .85 * np.tanh(dry / .85)
    return signal.sosfilt(signal.ellip(10, .2, 70, TOP_HZ, fs=SR, output="sos"), soft)


dry = scene()
out = record(dry)
inscribe(out)
```